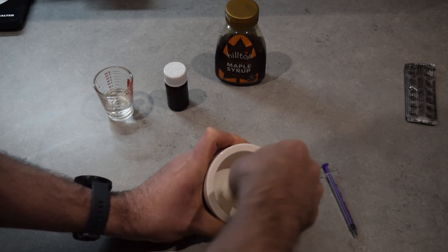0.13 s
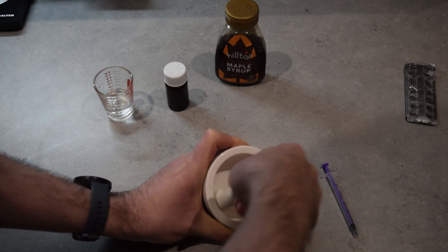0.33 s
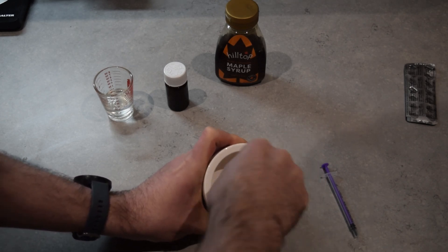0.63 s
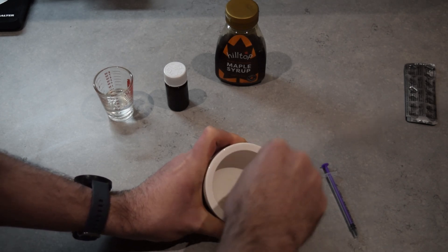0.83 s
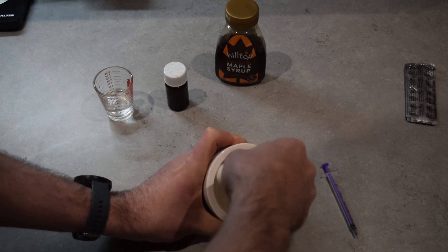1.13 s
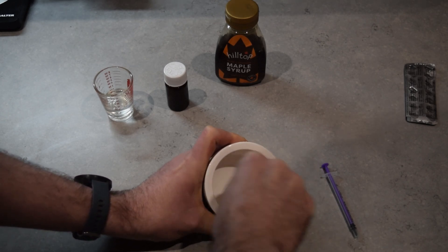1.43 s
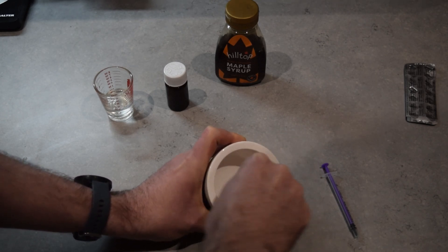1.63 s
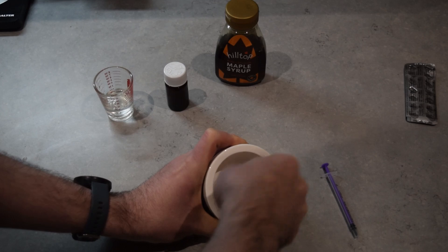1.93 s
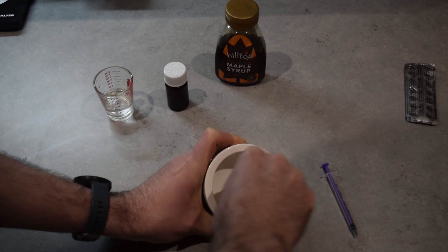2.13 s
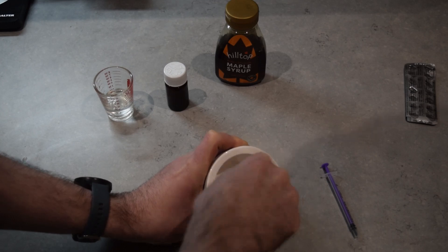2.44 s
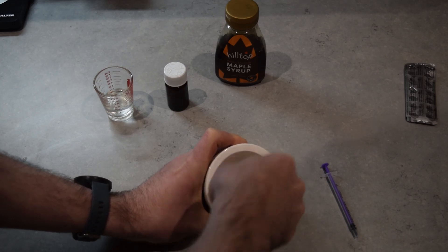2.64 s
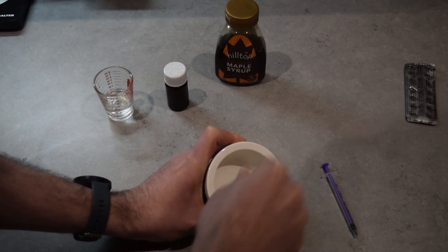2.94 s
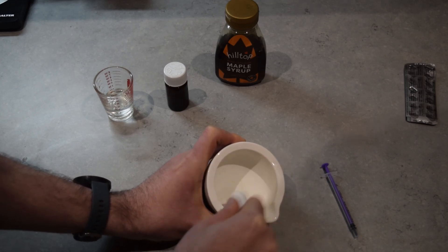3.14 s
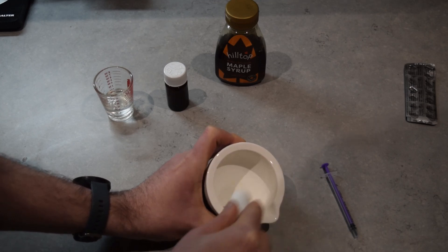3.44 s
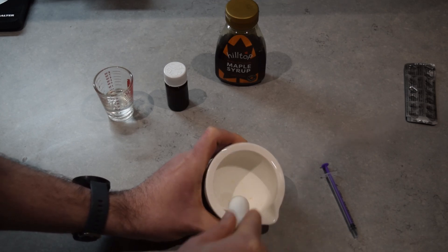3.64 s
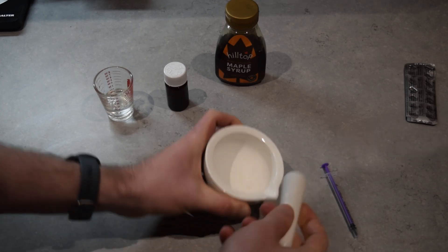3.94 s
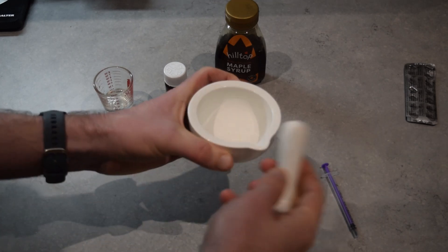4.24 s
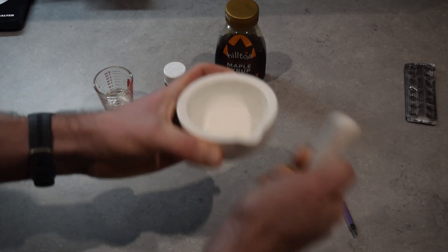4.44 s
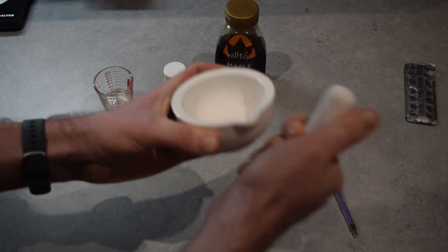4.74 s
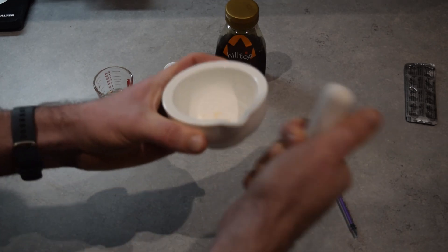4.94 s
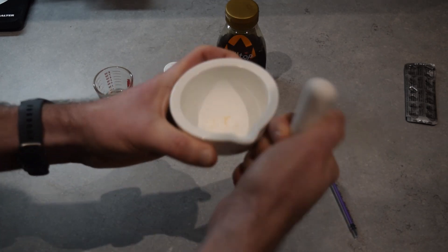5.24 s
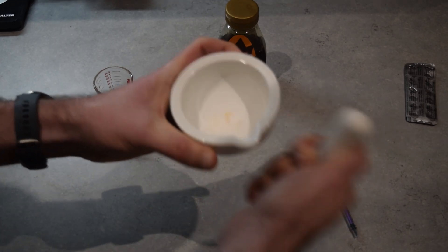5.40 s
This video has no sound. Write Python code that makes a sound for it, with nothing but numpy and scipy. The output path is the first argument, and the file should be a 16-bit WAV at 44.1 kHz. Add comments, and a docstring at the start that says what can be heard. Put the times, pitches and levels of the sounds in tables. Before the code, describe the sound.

A porcelain pestle knocks and grinds in a mortar on a worktop, then clinks against the wall, followed by soft taps.

```python
"""A porcelain pestle cracks a tablet in a porcelain mortar on a worktop and grinds it in a few strokes.
Impacts excite the damped modes of bowl, pestle and worktop; stick-slip friction drives the grinding,
with bumps over crumbs on the floor of the bowl and a light rasp up its wall. The pestle is then knocked
five times against the wall; the mortar is lifted, clinks once more and is tapped softly by hand to gather
the powder. A small, fairly live room reverberates, over faint air noise and mains hum."""
import sys
import numpy as np
from scipy import signal
from scipy.io import wavfile
from scipy.ndimage import uniform_filter1d

SR = 44100
rng = np.random.default_rng(int(sys.argv[2]) if len(sys.argv) > 2 else 0)


def master_out(mix):
    """Clip the mix to full scale and print it as 16-bit PCM to the path in sys.argv[1]."""
    frames = np.transpose(np.atleast_2d(mix))
    ceiling = np.clip(frames, -1, 1)
    pcm = np.round(ceiling * 32767).astype(np.int16)
    wavfile.write(sys.argv[1], SR, pcm)


N = 245626
TIME = np.arange(N) / SR
AGE, LONG_AGE = TIME[:SR // 4], TIME[:2 * SR // 3]   # time since a contact, s
TOUCH_S = .02   # a unit contact has the energy of rms 1 held this long
VARY_DB = 3   # the point of contact shifts each mode's level by up to this much

# Impacts of the pestle on bare porcelain, and the contacts as the mortar rocks back after some knocks: t/s,
# downward force/dB, sideways force/dB, hardness/dB
BLOWS = [(0.048, -21.5, -61, -7.5), (0.3, -21.5, -43, -19.5), (0.578, -46.5, -28.5, 6.5),
         (0.9761, -40.5, -38, -4), (0.981, -38, -66, -15), (1.301, -50, -45, -0.5),
         (2.7618, -45, -38.5, -8.5), (3.1207, -32.5, -23, 10.5), (3.144, -49.5, -28, -21),
         (3.2767, -27, -22.5, 6), (3.4386, -26, -22.5, 5), (3.5843, -30.5, -21.5, 3.5),
         (3.756, -62.5, -23.5, 6), (3.766, -51, -26, -12), (3.774, -29, -37.5, -1), (4.308, -113, -34, -6)]
# High modes of the bowl: f/Hz
CHIME_HZ = [10895, 10962, 11272, 13130, 13400]
# Strength and decay of each high mode: level/dB, T60/s
CHIME_DECAYS = [(0, 0.045), (13.5, 0.055), (4, .055), (-17, 0.11), (-15, 0.057)]


def blows():
    """Impact excitation: downward force drives the worktop, sideways the bowl; hardness adds treble."""
    out = np.zeros((2, N))
    chime_modes = np.column_stack([CHIME_HZ, CHIME_DECAYS])
    for s, down_db, side_db, hard_db in BLOWS:
        down, side, hard = from_db([down_db, side_db, hard_db])
        # the shares of the two forces add in energy
        knock = np.hypot(down * from_db(-3.5), side * from_db(-12.5))
        clack = from_db(0.23 * hard_db) * np.hypot(down * from_db(-16.5), side * from_db(-22.5))
        snap = hard * np.hypot(down * from_db(-17), side * from_db(-16))
        chime = side * hard * from_db(-7) * struck(chime_modes, spread=1.7, vary_db=VARY_DB)
        contact = snap * crack(4300, 11100, t60=0.0023, chatter_db=-20.5, chatter_t60=0.076, width=0.25)
        foot = mortar_on_worktop(thump=down * from_db(-15.5), thud=down, knock=knock)
        add(out, s, foot + clack * pestle_clack() + chime + contact)
        add(out, s, side * bowl_ring(s))
    return out


# Modes of the bowl pressed by the pestle: f/Hz
PRESSED_HZ = [4285, 4360, 4412, 4502, 5150, 5345, 5600]
# Strength and decay of each pressed mode: level/dB, T60/s
PRESSED_DECAYS = [(-10.5, 0.018), (-6.5, 0.035), (-9, 0.05), (-10, 0.071), (-4.5, 0.0081), (-24.5, 0.013),
                  (-17, 0.047)]
# Modes of the lifted bowl: f/Hz, level/dB, T60/s
FREE_MODES = [(4365, 0, .085), (4495, -19, .06), (5400, -13, .004)]
# A faint, lingering ring near 4.37 kHz that flutters: f/Hz, level/dB, T60/s
RIM_MODES = [(4370, -29, .68), (4343, -32, .62), (4409, -33, .58)]
LIFTED_S, HELD_RIM_DB = 4.1, -3.5


def bowl_ring(s):
    """Mode splitting: pressed by the pestle, the bowl rings in a cluster; lifted, with one clean ping."""
    if s > LIFTED_S:
        return panned(struck(FREE_MODES + RIM_MODES, spread=0.51, age=LONG_AGE), 4.2)
    cluster = np.column_stack([PRESSED_HZ, PRESSED_DECAYS])
    held_rim = np.add(RIM_MODES, [0, HELD_RIM_DB, 0])
    return panned(struck(np.vstack([cluster, held_rim]), spread=1.3, vary_db=VARY_DB, age=LONG_AGE), 1.5)


# Modes of the pestle: f/Hz, level/dB, T60/s
PESTLE_MODES = [(2077, -7, 0.029), (2246, 3, 0.011), (2695, -2.5, 0.017), (2852, -2.5, .03),
                (3146, -9, 0.0072), (3520, 9, 0.004), (3390, -1.5, 0.0083)]


def pestle_clack():
    """Damped free vibration: the hand cuts the pestle's own ring short."""
    ring = struck(PESTLE_MODES, spread=0.77, vary_db=VARY_DB)
    contact = crack(1770, 4800, t60=0.035, chatter_db=-16.5, chatter_t60=0.26, width=0.18)
    return panned(ring + contact, -4)


# Deep modes of the worktop: f/Hz, level/dB, T60/s
THUMP_MODES = [(125, -4, .06), (144, -0.5, 0.07), (213, -4, 0.06), (236, -8, 0.11), (297, -0.5, 0.049)]
# Middle modes of the worktop: f/Hz, level/dB, T60/s
WORKTOP_MODES = [(410, -11, 0.04), (452.5, 5, 0.051), (510, -7, 0.026), (525, 1.5, 0.052),
                 (623.2, -0.5, 0.048), (671, -6.5, 0.02), (807, -2, 0.066), (848.7, 1, 0.038),
                 (1034.7, 5.5, 0.01)]
# Modes of the bowl's hollow knock: f/Hz, level/dB, T60/s
KNOCK_MODES = [(1118, 3, 0.019), (1317, -2.5, 0.016), (1361.7, 6, 0.033), (1455.6, 0, 0.024),
               (1703.4, -10, 0.055), (1863, -7.5, 0.011)]


def mortar_on_worktop(thump, thud, knock):
    """Structure-borne sound: the foot drives the worktop while the bowl knocks and briefly rattles."""
    deep = thump * struck(THUMP_MODES, spread=.1, vary_db=VARY_DB)
    middle = thud * filtered(struck(WORKTOP_MODES, spread=.1, vary_db=VARY_DB), 350, "high", order=4)
    hollow = knock * struck(KNOCK_MODES, spread=0.14, vary_db=VARY_DB)
    rattle = knock * from_db(-4) * crack(600, 1510, t60=0.07, chatter_db=-25, chatter_t60=0.34, width=0.08)
    return panned(deep + middle + hollow + rattle, 2.7)


def settling(gap_s=.0068, loss_db=3):
    """Inelastic rebound: a sideways blow tips the mortar, whose foot lands four times, ever weaker."""
    out = np.zeros((2, N))
    for s, down_db, side_db, _ in BLOWS:
        down, side = from_db([down_db, side_db])
        for bounce in range(1, 5):
            touch = mortar_on_worktop(thump=from_db(-3.5), thud=0.95, knock=from_db(-5.5))
            force = down * side / (down + side) * from_db(-loss_db * bounce)
            add(out, s + gap_s * (bounce + rng.uniform(-.3, .3)), force * touch)
    return out


# Modes of the mortar rocking on the worktop: f/Hz, level/dB, T60/s
ROCKING_MODES = [(84.6, -3.5, 0.11), (122.6, -0.5, 0.069), (145, -4, 0.21), (211, -9.5, 0.021),
                 (257, -6.5, 0.1)]
# Modes of the bowl excited by bursting grains: f/Hz, level/dB, T60/s
GRIT_MODES = [(4365, -6, .05), (5400, 5, .005), (8000, 3, .003), (10960, -7, .03), (11280, -9, .025),
              (13150, -4, .012), (13450, -4, .012)]


def grinding():
    """Stick-slip friction: slips shake mortar and worktop while finer grains burst under the pestle."""
    rocking, drag, scrape, grit = stroke_forces()
    cycles = judder(hz=78.34, wobble=0.2)
    jolts = rms_one(np.diff(np.floor(cycles), prepend=0) * rng.normal(1, 1, N))   # one per cycle
    surge = rms_one(from_db(-11 * (cycles % 1)))   # each slip starts hard and eases off
    coarse = surge * slips(per_s=730, size_db=1)
    fine = surge * slips(per_s=2300, size_db=-4)
    cushioned = filtered(coarse * drag, 430, "low")   # a bed of powder dulls the slips
    body = from_db(-3) * through(jolts * rocking, struck(ROCKING_MODES, spread=.1))
    body += from_db(3.5) * through(cushioned, struck(WORKTOP_MODES, spread=0.12))
    body += through(coarse * scrape, struck(KNOCK_MODES, spread=0.25))
    crumbs = from_db(-15) * through(fine * scrape, struck(PESTLE_MODES, spread=0.3))
    grains = from_db(3.5) * through(fine * grit, struck(GRIT_MODES, spread=1))
    hiss = crack(3875, 13600, t60=0.027, chatter_db=-6, chatter_t60=.04)
    powder = from_db(-6) * through(fine * grit, hiss)
    return (panned(body, 1.4) + panned(crumbs, 1.5) + grains + powder) / np.sqrt(TOUCH_S * SR)


# Grinding strokes: t/s, duration/s, force/dB, height in the bowl (0 floor, 1 rim)
STROKES = [(0.0, 0.067, -47, 0.73), (0.622, 0.089, -44.5, 0.58), (0.738, 0.11, -51.5, 0.62),
           (0.993, 0.14, -47, 0.14), (1.117, 0.062, -53.5, 0.45), (1.35, 0.21, -48, 0.26),
           (1.661, 0.084, -49.5, 0.07), (1.757, 0.063, -45.5, 0.2), (1.841, 0.12, -58, 0.83),
           (2.077, 0.175, -48.5, 0.42), (2.371, .13, -47.5, 0.18), (2.525, 0.12, -56, 0.96),
           (2.799, .08, -47.5, 0.52)]
# Single grains bursting under the pestle: t/s, level/dB
CRUNCHES = [(1.62, -58.5), (1.675, -58.5), (2.301, -56)]


def stroke_forces(catch_db=3, catch_hz=27.8, crunch_s=0.0094):
    """Driving point: on the floor the pestle rocks the mortar, up the wall it rasps; grains add bursts."""
    rocking, drag, scrape, grit = np.zeros((4, N))
    # the pestle catches and frees itself unevenly
    catching = from_db(catch_db * rms_one(filtered(rng.standard_normal(N), catch_hz, "low")))
    for start, length, force_db, height in STROKES:
        force = from_db(force_db) * pressure(start, length) * catching
        drag += force
        rocking += force * from_db(3.5 - 24 * height)
        scrape += force * from_db(-10 + 3.3 * height)
        grit += force * from_db(-38 + 20 * height)
    for s, level_db in CRUNCHES:
        burst = from_db(level_db) * np.exp(-np.minimum(((TIME - s) / crunch_s) ** 2, 20))
        grit += burst
        scrape += from_db(9) * burst
    return rocking, drag, scrape, grit


def pressure(start, length, attack_s=0.0074, release_s=.014, sag_db_per_s=11):
    """Normal force of one stroke: the hand leans in, slowly tires and lets go."""
    age = np.maximum(TIME - start, 0)
    attack = 1 - np.exp(-age / attack_s)
    sag = from_db(-sag_db_per_s * np.minimum(age, length))
    release = np.exp(-np.clip((age - length) / release_s, 0, 20))
    return attack * sag * release


def judder(hz, wobble):
    """Relaxation oscillation: a running count of stick-slip cycles, wandering as the pestle turns."""
    wander = rms_one(filtered(rng.standard_normal(N), 11, "low"))
    return np.cumsum(hz * np.exp(wobble * wander)) / SR


def slips(per_s, size_db):
    """Poisson process: slips over crumbs are impulses of random time, size and sign."""
    sizes = from_db(size_db * np.minimum(rng.exponential(1, N), 3.5)) * rng.choice([-1, 1], N)
    clicks = sizes * (rng.random(N) < per_s / SR)
    # the hand keeps the mean force steady over a few hundredths of a second
    local_power = np.abs(uniform_filter1d(clicks ** 2, size=SR // 25))
    return clicks / np.sqrt(local_power + per_s / SR * 0.091)


# Drops of the pestle off a crumb onto the powder: t/s, force/dB, hardness/dB
BUMPS = [(0.644, -54.5, 20.5), (0.695, -51, 13), (1.089, -39, -6), (1.104, -34, 2.5), (1.333, -43.5, -11),
         (1.465, -76, 18), (1.54, -40.5, -8), (1.722, -48.5, 0), (1.882, -48, -13), (2.074, -46.5, -11.5),
         (2.122, -50, 2.5), (2.368, -41.5, 2), (2.419, -52, -9), (2.462, -48.5, -3)]


def bumps(rise_s=0.0025, cutoff_hz=2000):
    """Cushioned impact: powder slows the onset and dulls the treble, so the bowl knocks without ringing."""
    out = np.zeros((2, N))
    swell = 1 - np.exp(-AGE / rise_s)
    for s, force_db, hard_db in BUMPS:
        foot = mortar_on_worktop(thump=from_db(-14.5 - .5 * hard_db), thud=0.79, knock=from_db(hard_db - 9))
        clack = from_db(hard_db - 14.5) * pestle_clack()
        add(out, s, from_db(force_db) * filtered(foot + clack, cutoff_hz, "low") * swell)
    return out


# Skids of the pestle coming to rest: t/s, duration/s, initial f/Hz, final f/Hz, level/dB
SKIDS = [(0.794, 0.07, 1633, 466, -56), (1.544, 0.054, 632, 478, -48.5), (2.204, 0.095, 1070, 438, -52),
         (2.852, 0.038, 1110, 499, -49)]


def skids():
    """Roughness noise: pitch follows sliding speed, so the rasp falls as the pestle slows."""
    out = np.zeros((2, N))
    for s, length, start_hz, end_hz, level_db in SKIDS:
        progress = np.clip(AGE / length, 0, 1)
        travel = np.cumsum((end_hz / start_hz) ** progress)
        surface = rms_one(filtered(rng.standard_normal(len(AGE)), [start_hz * .72, start_hz * 1.2], "band"))
        arch = np.sqrt(4 * progress * (1 - progress))
        rasp = np.interp(travel, np.arange(len(AGE)), surface) * arch
        add(out, s, panned(from_db(level_db) * rasp, 1.5))
    return out


# Taps of the hand on the lifted mortar: t/s, level/dB, low-pass f/Hz
TAPS = [(4.604, -69.5, 916), (4.800, -65.5, 999), (4.968, -65, 1703), (5.1516, -53.5, 2582),
        (5.347, -57.5, 2740), (5.561, -59, 2620)]
# Modes of the bowl under the hand: f/Hz, level/dB, T60/s
DAMPED_MODES = [(397, 1, 0.022), (600, 1.5, 0.042), (969, -4.5, 0.02), (1120, -5, 0.031), (1500, 3, 0.012),
                (1910, 6.5, 0.011), (2330, 11, 0.0081)]


def hand_taps():
    """Contact damping: flesh stills the bowl at once; the powder hops and settles after each tap."""
    out = np.zeros((2, N))
    for s, level_db, cutoff_hz in TAPS:
        bowl = struck(DAMPED_MODES, spread=0.26, vary_db=VARY_DB)
        pat = one_touch(filtered(bowl, cutoff_hz, "low", order=4))
        powder = from_db(-21) * crack(4400, 12980, t60=0.018, chatter_db=-21, chatter_t60=0.18)
        add(out, s, from_db(level_db) * (pat + powder))
    return out


def struck(modes, spread, vary_db=0, age=AGE):
    """Modal superposition: decaying sines whose lobes reach the two ears `spread` radians apart."""
    out = np.zeros((2, len(age)))
    for k, (hz, level_db, t60) in enumerate(modes):
        phase = spread * rng.choice([-1, 1]) * np.array([[.5], [-.5]])
        strength = (-1) ** (k // 2) * from_db(level_db + vary_db * rng.uniform(-1, 1))
        out += strength * from_db(-60 * age / t60) * np.sin(2 * np.pi * hz * age + phase)
    return one_touch(out)


def crack(low_hz, high_hz, t60, chatter_db, chatter_t60, width=1):
    """Contact noise: a sharp band-limited burst, then fine chatter of the two surfaces."""
    noise = width * rng.standard_normal((2, len(AGE))) + rng.standard_normal(len(AGE))
    fade = from_db(-60 * AGE / t60) + from_db(chatter_db - 60 * AGE / chatter_t60)
    return one_touch(filtered(noise * fade, [low_hz, high_hz], "band", order=3))


# Diffuse field of the room: f/Hz, T60/s, left-right correlation
ROOM_FIELD = [(60, .45, .95), (150, .5, .96), (450, .62, .93), (1300, .62, .85), (2800, .52, .1),
              (4400, .49, -.15), (10000, .45, .1), (14000, .38, 0)]
# Strength of the reverberation: f/Hz, level/dB
REVERB_LEVELS = [(60, -13.5), (150, -1), (450, -6.5), (1300, -10.5), (2800, -3), (4600, -3), (7000, -8.5),
                 (12000, -8.5)]


def room(x, build_s, early_db, early_t60):
    """Reverberation: near walls answer first, then a diffuse tail dies away, fastest in the treble."""
    age, response = TIME[:SR], 0
    for hz, noise in diffuse_bands(size=SR):
        t60, wet_db = at_hz(ROOM_FIELD, hz)[0], at_hz(REVERB_LEVELS, hz)[0]
        fade = from_db(-60 * age / t60) + from_db(early_db - 60 * age / early_t60)
        gain = from_db(wet_db) * np.sqrt(np.log(1000) / (t60 * SR))   # tail energy independent of T60
        response = response + noise * fade * gain
    return through(x, response * (1 - np.exp(-age / build_s)))


def diffuse_bands(size):
    """Interaural coherence: half-octave bands of noise, as alike in the two ears as the room makes them."""
    edges = 22 * 2 ** np.arange(0, 10, .5)
    white = rng.standard_normal((2, 2, size))
    for k, (low, high) in enumerate(zip(edges, edges[1:])):
        hz = np.sqrt(low * high)
        mid, side = filtered(white[k % 2], [low, high], "band")
        alike = np.clip(at_hz(ROOM_FIELD, hz)[1], -.99, .99)
        yield hz, np.sqrt(1 + alike) * mid + np.sqrt(1 - alike) * np.array([side, -side])


# Spectrum of the room's still air: f/Hz, relative spectral density level/dB
AIR_SPECTRUM = [(15, -31), (25, -10.5), (74, -25), (114, -29.5), (516, -35.5), (607, -37.5), (1740, -40),
                (2000, -33.5), (3520, -52.5), (4370, -43), (10700, -45.5), (16000, -68)]


def background(air_db=-76, hum_db=-76, hum_hz=59.2):
    """Noise floor: faint diffuse room noise and a low mains hum."""
    air = sum(noise * from_db(at_hz(AIR_SPECTRUM, hz)[0]) for hz, noise in diffuse_bands(size=N))
    hum = np.sin(2 * np.pi * hum_hz * TIME)
    return from_db(air_db) * rms_one(air) + from_db(hum_db) * rms_one(hum)


def from_db(db):
    """Level in decibels to amplitude ratio."""
    return 10 ** (np.asarray(db) / 20)


def rms_one(x):
    """Power normalisation to rms 1."""
    return x / np.sqrt(np.mean(x ** 2) + 1e-20)


def one_touch(x):
    """Energy normalisation to rms 1 held for TOUCH_S."""
    return rms_one(x) * np.sqrt(TOUCH_S * SR / x.shape[-1])


def panned(x, left_db):
    """Interaural level difference: left exceeds right by left_db."""
    return x * from_db(np.array([[left_db], [-left_db]]) / 2)


def filtered(x, hz, kind, order=2):
    """Causal Butterworth filter."""
    return signal.sosfilt(signal.butter(order, np.clip(hz, 10, .45 * SR), kind, fs=SR, output="sos"), x)


def at_hz(rows, hz):
    """Interpolation of a table's columns on a log-frequency axis."""
    grid, *columns = np.transpose(rows)
    return [np.interp(np.log(hz), np.log(grid), c) for c in columns]


def add(out, s, sound):
    """Superposition of a sound starting at time s."""
    start = round(s * SR)
    out[:, start:start + sound.shape[-1]] += sound[..., :max(N - start, 0)]


def through(x, response):
    """Convolution with a stereo impulse response."""
    return signal.fftconvolve(np.atleast_2d(x), response, axes=-1)[:, :N]


def scene():
    """Superposition of the mortar's direct sound, its reverberation and the noise floor."""
    mortar = blows() + settling() + bumps() + grinding() + skids() + hand_taps()
    mortar = filtered(mortar, 38, "high")   # so small a body radiates little deep bass
    return mortar + room(mortar, build_s=0.0014, early_db=-6, early_t60=0.055) + background()


OVERLOAD, CUTOFF_HZ = .8, 16300


def record(dry):
    """Saturation and band limiting: the microphone rounds peaks and softens treble; the top is cut."""
    rounded = dry / (1 + (dry / OVERLOAD) ** 4) ** (1 / 4)
    soft = filtered(rounded, 13800, "low", order=6)
    return signal.sosfilt(signal.ellip(10, .1, 80, CUTOFF_HZ, fs=SR, output="sos"), soft)


dry = scene()
out = record(dry)
master_out(out)
```